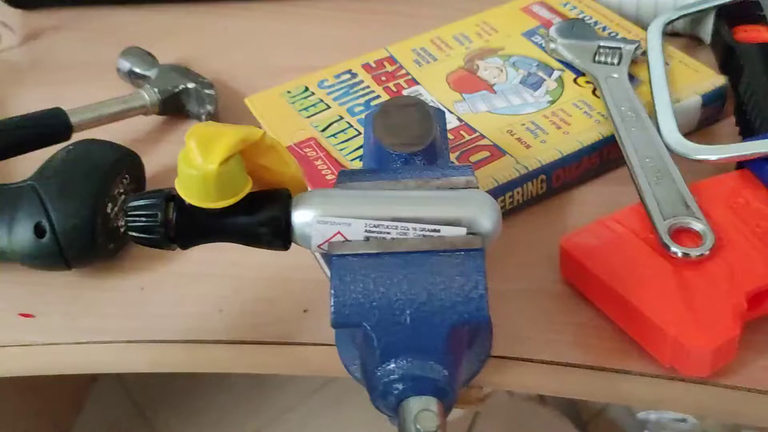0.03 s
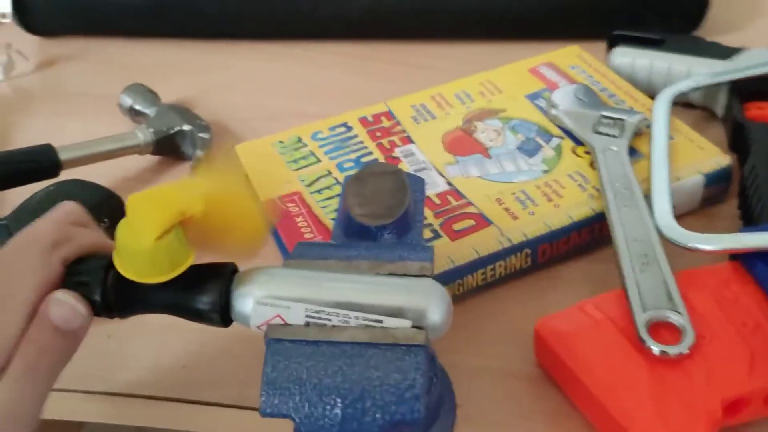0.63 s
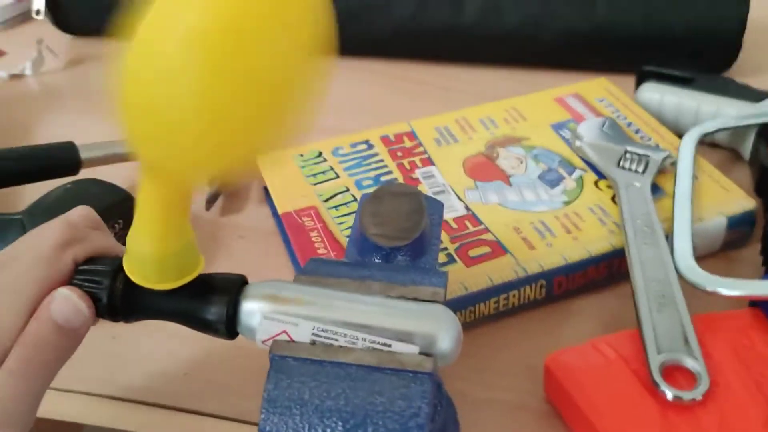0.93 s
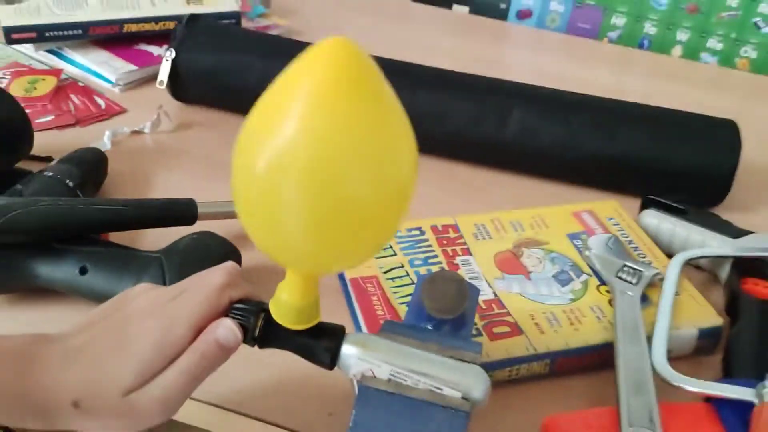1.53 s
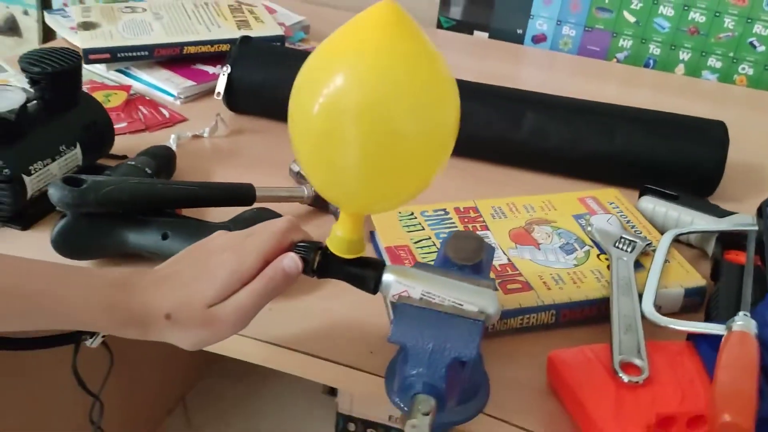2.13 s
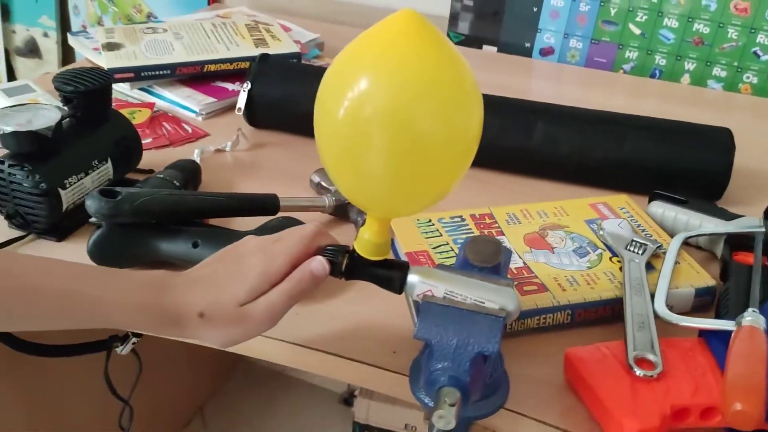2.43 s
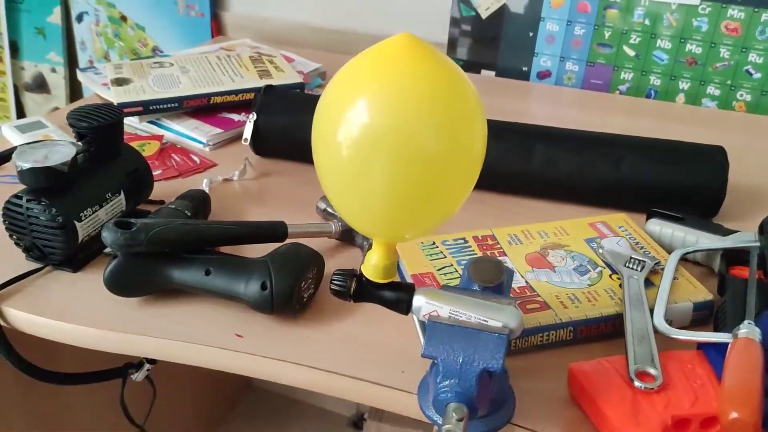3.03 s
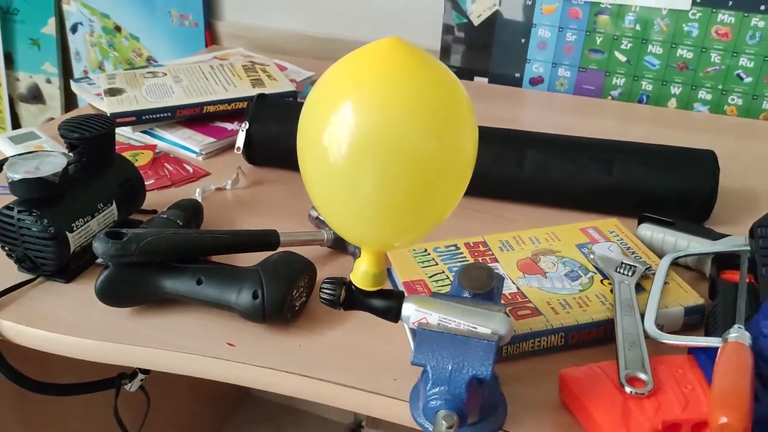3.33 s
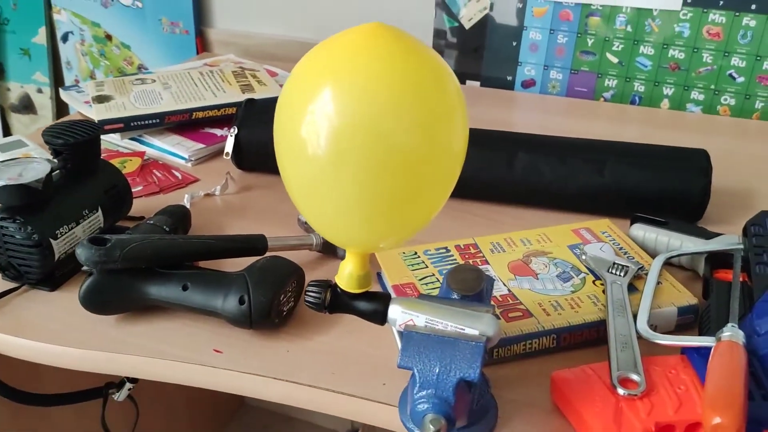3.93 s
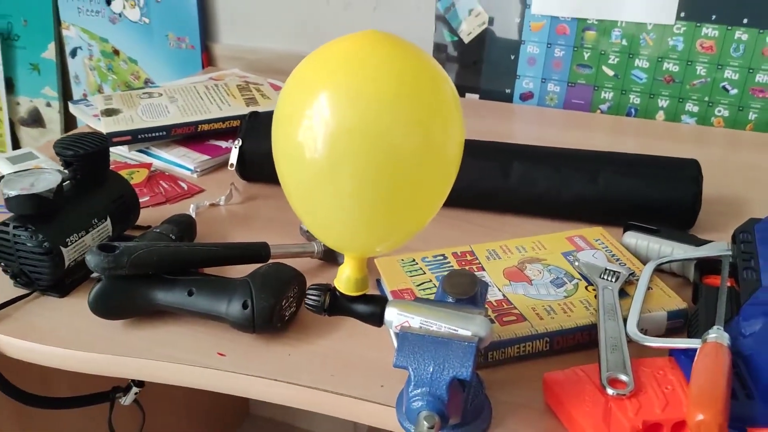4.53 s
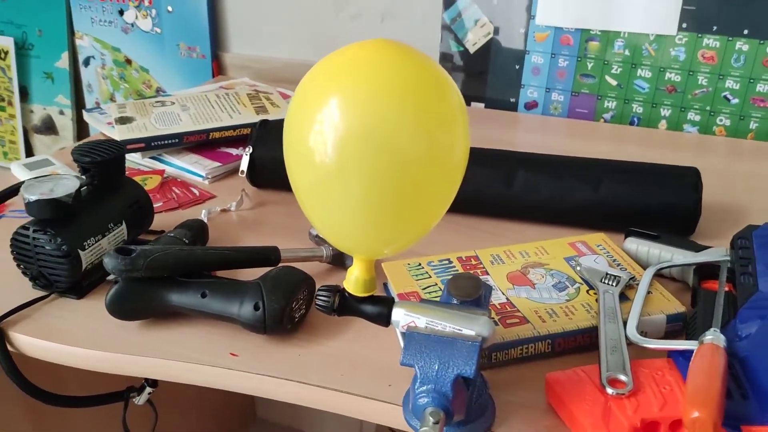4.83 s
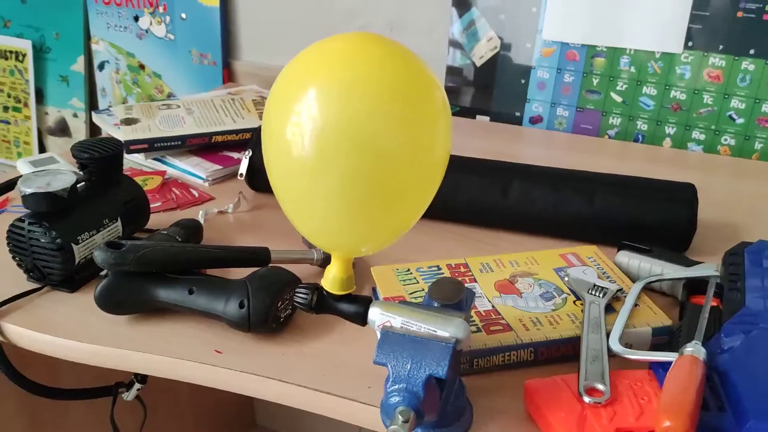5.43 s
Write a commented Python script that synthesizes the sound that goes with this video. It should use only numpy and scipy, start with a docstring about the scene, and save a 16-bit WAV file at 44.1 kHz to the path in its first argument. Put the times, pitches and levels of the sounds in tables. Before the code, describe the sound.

Faint valve clicks, then gas spurts from a cartridge and hisses loudly into a balloon, fading as the balloon swells.

```python
"""In a small humming room, a hand turns the valve of a CO2 cartridge clamped on a bench: clicks, seeping gas.
At 0.76 s the valve spurts, then opens to a loud turbulent hiss; a limp balloon flops, honks and stands up.
As it swells, its cavity resonances glide down and its skin rings higher; the hiss sinks with the pressure.
A low throb passes at 2.6 s, soft handling rubs follow after 4 s, and a distant engine drones near the end."""
import sys
import numpy as np
from scipy import signal
from scipy.fft import rfft, irfft, next_fast_len
from scipy.io import wavfile
from scipy.ndimage import map_coordinates

SR = 44100
rng = np.random.default_rng(int(sys.argv[2]) if len(sys.argv) > 2 else 0)


def master_out(mix):
    """Clip the mix to full scale and print it as 16-bit PCM to the path in sys.argv[1]."""
    frames = np.transpose(np.atleast_2d(mix))
    ceiling = np.clip(frames, -1, 1)
    pcm = np.round(ceiling * 32767).astype(np.int16)
    wavfile.write(sys.argv[1], SR, pcm)


N = 250929
TIME = np.arange(N) / SR
OPEN_S, OPEN_RISE_S, INFLATE_S = 0.849, 0.054, 0.87

# Jet spectrum: f/Hz, left/dB, right/dB
JET_SPECTRUM = [(150, -34.5, -37), (463, -29.5, -30), (872, -22, -21.5), (1002, -14, -13.5),
                (1495, -10, -5), (2340, -9, -6), (2850, -13, -8), (3290, -3.5, -11.5), (4170, -3.5, -8.5),
                (5140, -9, -12.5), (6540, -14.5, -16.5), (7680, -14, -3), (9000, -18.5, -9), (9690, -9, -9),
                (10580, -16, -25), (11600, -32.5, -33.5), (13730, -14.6, -20), (16400, -22.5, -31)]
# Valve and cartridge resonances: f/Hz, width/Hz, gain/dB
VALVE_MODES = [(1010, 110, 3), (1410, 90, 3), (2760, 220, -1.3), (3040, 50, 2.5), (3236, 45, 2),
               (3379, 70, 2.2), (3626, 55, 1.5), (3779, 50, 2), (4253, 60, 2), (4610, 80, 1),
               (7702, 60, 2.5), (9409, 50, 4)]
# Phase lead of left over right: f/Hz, lead/rad
JET_PHASE = [(300, 0), (1500, -0.14), (2000, 0.54), (3000, 1.5), (3700, 4), (4500, 4), (9000, 4.5)]
# Roar, hiss, fizz: full-pressure level/dB, pressure slope/(dB/dB), limp balloon/dB, kinked neck/dB
JET_LEVELS = [(-27, 1.1124, -1, 0), (-27.5, 0.8054, -1.5, -4.5), (-26.5, 1.25, -5, -0.5)]


def jet(roar_edge_hz=2800, fizz_edge_hz=6000, surge_db=0.46, sputter_db=0.4, eddy_db=0.5,
        upright_s=1.08, upright_rise_s=0.0096, pan_start_db=-1.43, pan_db_per_s=0.34, flop_db=6):
    """Turbulent gas fills the balloon: big eddies roar, small ones fizz, all sputter with the flow."""
    def response(hz):
        sides_db = np.array([along(JET_SPECTRUM, hz, column) for column in (1, 2)])
        lead = np.exp(1j * along(JET_PHASE, hz) * np.array([[0.5], [-0.5]]))
        return amp(sides_db + peaks(VALVE_MODES, hz)) * lead

    gas = balloon(filtered(stereo_noise(), response))
    below = lambda edge_hz: filtered(gas, lambda hz: 1 / (1 + (hz / edge_hz) ** 10))
    roar, below_fizz = below(roar_edge_hz), below(fizz_edge_hz)
    hiss, fizz = below_fizz - roar, gas - below_fizz
    limp = (1 - np.tanh((TIME - upright_s) / upright_rise_s)) / 2
    kink = swell(at_s=0.99, length_s=0.065)
    out = np.zeros((2, N))
    for band, (full_db, slope, limp_db, kink_db) in zip((roar, hiss, fizz), JET_LEVELS):
        level_db = full_db + slope * pressure_db() + limp_db * limp + kink_db * kink
        out += band / np.std(band.mean(0)) * amp(level_db + eddy_db * wobble(70))
    pan_db = pan_start_db + pan_db_per_s * (TIME - OPEN_S)  # left minus right; the microphone backs away
    pan_db += flop_db * swell(at_s=0.863, length_s=0.036)  # the balloon flops left
    flow = valve_opening() * amp(surge_db * wobble(22.115) + sputter_db * wobble(260))
    return out * flow * amp([pan_db / 2, -pan_db / 2])


# Spurts as the valve cracks open: t/s, attack/s, hold/s, opening/dB
VALVE_SPURTS = [(0.764, 0.013, 0.038, -.5), (0.857, 0.016, 0.033, 2.5), (0.927, 0.0063, 0.0095, 4)]


def valve_opening(release_s=0.01, leak_db=-13.5):
    """The valve spits three times, leaks in between and stays open."""
    spurts = [amp(db) * rise(start_s, attack_s) * np.exp(-since(start_s + hold_s) / release_s)
              for start_s, attack_s, hold_s, db in VALVE_SPURTS]
    leak = amp(leak_db) * rise(*VALVE_SPURTS[0][:2])
    return np.linalg.norm([*spurts, leak, rise(OPEN_S, OPEN_RISE_S)], axis=0)


def pressure_db(hold_s=0.97, knee=1.94):
    """Cartridge pressure holds briefly, then falls as 1/t while it cools and empties."""
    return -20 / knee * np.log10(1 + (since(OPEN_S) / hold_s) ** knee)


# Cavity peaks (+) and notches (-), before depth scaling:
# slack f/Hz, width/Hz, strongest t/s, length/s, left/dB, right/dB
CAVITY_MODES = [(3400, 400, 1.06, 0.3, 5.5, 4), (3500, 160, 2.25, 1.9, 3, 2), (4680, 450, 1.11, 0.19, 5, 8),
                (5010, 580, 1.01, 0.2, -10.5, -13), (5040, 140, 2.54, 0.27, 0, 10.5),
                (5150, 540, 2.73, 1.26, 4.5, -1.5), (5750, 210, 1.05, 0.42, 10.5, 13),
                (6310, 670, 1.05, 0.46, -12.5, -5.5), (6350, 110, 1.86, 0.25, 8.5, 4),
                (6360, 1100, 3.76, 0.73, 2, 4), (7120, 240, 0.8, 0.76, 12, 8.5),
                (7340, 900, 1.81, 0.36, -0.5, 8.5), (7250, 230, 3.3, 0.76, -2.4, -6.5),
                (7690, 130, 2.98, 0.45, 5.5, -3), (7900, 88, 5.66, 0.24, 4, 4),
                (8050, 130, 4.85, 0.46, 4.5, 4), (9150, 170, 4.9, 0.35, 3.5, 0),
                (7840, 630, 0.71, 1.26, -6.5, -11), (8100, 420, 3.5, 1.9, -0.5, -5),
                (8580, 280, 2, 1.26, 4.5, 11), (9160, 200, 4.5, 1.1, 3.5, 3.5),
                (9350, 1070, 1.4, 2.6, -4, -6), (9980, 270, 1.75, 3.4, 3, 6.5),
                (10900, 360, 2.4, 2.3, -2, -9.5), (11330, 370, 2.7, 1.35, 2, 7.5),
                (12400, 180, 3.9, 1.5, 0, -2), (12780, 430, 1.6, 3, 1.5, 0.5),
                (13700, 350, 7.2, 0.64, -10, 1), (14450, 260, 2.05, 0.47, 8.5, 3),
                (15500, 220, 4.7, 0.83, 4, -3), (15000, 300, 1.5, 0.33, 2, 6)]
# Honk of the slack neck: f/Hz, width/Hz, gain/dB
NECK_MODES = [(1700, 220, 5.5), (3040, 160, 6.5)]


def balloon(gas, depth=1.45, flat_share=0.6, skin_hz=1608, skin_width_hz=520, stiffening=0.63,
            slack_s=0.52, spacing_hz=1430, fine_db=3.0, fine_slack_db=1.8, fine_onset_hz=2800,
            fine_density=11, fine_turnover=14):
    """Cavity resonances sink as 1/radius while the stretching rubber rings ever higher."""
    hz, t, spectrum = signal.stft(gas, SR, nperseg=1024, noverlap=768)
    hz = hz[:, None]
    size = radius(t)
    filling = np.interp(t, TIME, rise(OPEN_S, OPEN_RISE_S))
    slack = filling * np.exp(-(since(INFLATE_S, t) / slack_s) ** 2)
    sides = lambda left_db, right_db: np.array([left_db, right_db])[:, None, None]
    modes = [(slack_hz / size, width_hz, sides(left_db, right_db) * swell(at_s, length_s, t))
             for slack_hz, width_hz, at_s, length_s, left_db, right_db in CAVITY_MODES]
    cavity_db = depth * peaks(modes, hz) * (flat_share + (1 - flat_share) * filling)
    skin_mode = (skin_hz * size ** stiffening, skin_width_hz, sides(left_db=2.2, right_db=5))
    skin_db = filling * peaks([skin_mode], hz)
    honk_db = slack * peaks(NECK_MODES, hz)
    # Fine, uneven modes come and go between the main ones, independently on each side.
    grid = np.broadcast_arrays(hz * size / spacing_hz * fine_density, np.log(size) * fine_turnover)
    fine = np.array([map_coordinates(rng.standard_normal((512, 64)), grid, order=1, mode="wrap")
                     for _ in gas])
    trapped = 1 - np.exp(-(hz / fine_onset_hz) ** 4)  # the thin skin lets low notes through
    ripple_db = (fine_db + fine_slack_db * slack) * trapped * fine
    spectrum = spectrum * amp(cavity_db + skin_db + honk_db + ripple_db)
    return signal.istft(spectrum, SR, nperseg=1024, noverlap=768)[1][:, :N]


def radius(t, fill_per_s=1.54, rush_per_s=1.375, rush_s=0.85):
    """Radius over slack radius; a steady inflow and an early rush add volume, in slack volumes."""
    age_s = since(INFLATE_S, t)
    rush_volume = rush_per_s * rush_s * (1 - np.exp(-age_s / rush_s))
    return np.cbrt(1 + fill_per_s * age_s + rush_volume)


# Rubber flaps: t/s, length/s, f/Hz, width/Hz, level/dB
RUBBER_FLAPS = [(0.784, 0.015, 377, 420, -47.5), (.98, 0.039, 272, 100, -51.5),
                (1.27, 0.089, 272, 110, -56)]


def flaps():
    """The rubber flaps dully as the gas first arrives."""
    return noise_swells(RUBBER_FLAPS)


# Knob slips: t/s, level/dB, length/s, ring f/Hz
KNOB_SLIPS = [(0.198, -71, .006, 4600), (0.233, -67, .008, 2300), (0.235, -53, .012, 360),
              (0.381, -59.5, 0.0084, 2200), (0.39, -59, 0.025, 7800), (0.704, -56.5, 0.02, 7840)]


def knob(grain_db=3, lean_db=2.5, q=6):
    """The plastic knob creaks in its thread in short grainy slips, each with its own ring."""
    out = np.zeros((2, N))
    for at_s, db, length_s, ring_hz in KNOB_SLIPS:
        ring = lambda hz: 1 / (1 + 1j * q * (hz / ring_hz - ring_hz / (hz + 1)))
        friction = rng.standard_normal((2, N)) * amp(grain_db * wobble(500))
        out += amp(db) * np.exp(-np.abs(TIME - at_s) / length_s) * unit(filtered(friction, ring))
    return out * amp([[-lean_db], [lean_db]])


# Seal leak spectrum: f/Hz, relative level/dB
SEEP_SPECTRUM = [(500, -13), (1300, -4), (3000, -8), (6300, -12), (7750, -6), (9500, -13.5), (15500, -17)]


def seep(start_s=0.06, attack_s=0.13, level_db=-67):
    """Gas creeps past the seal as the knob turns, until the first spurt."""
    creeping = rise(start_s, attack_s) * (1 - rise(VALVE_SPURTS[0][0], OPEN_RISE_S))
    return amp(level_db + wobble(11.7)) * creeping * coloured(SEEP_SPECTRUM)


# Handling rubs: t/s, length/s, f/Hz, width/Hz, level/dB
HAND_RUBS = [(4.09, .06, 420, 327, -57.5), (4.33, 0.041, 297, 282, -56.5)]


def rubs():
    """Handling makes two soft, low rubs."""
    return noise_swells(HAND_RUBS)


def bench(x, count=14, lag_range_s=(0.002, 0.011), echo_db=-8, changes_per_s=1.3, low_cut_hz=980):
    """Short echoes off bench and tools come and go as the microphone moves: a hollow ringing."""
    echoes = np.zeros((2, N))
    for side, lags_s in enumerate(rng.uniform(*lag_range_s, (2, count))):
        for lag_s in lags_s:
            echoes[side] += wobble(changes_per_s) * np.pad(x[side], (int(lag_s * SR), 0))[:N]
    echoes = filtered(echoes, lambda hz: hz / np.hypot(hz, low_cut_hz))  # long waves pass the tools
    return x + amp(echo_db) / np.sqrt(count) * echoes


# Room decay: f/Hz, T60/s
ROOM_T60 = [(200, 0.071), (2000, 0.27), (8000, 0.021), (15000, 0.0045)]


def room(x, tail_db=-13):
    """The walls add a short tail."""
    hz, t, noise = signal.stft(rng.standard_normal((2, SR // 2)), SR, nperseg=256)
    decay = amp(-60 * t / along(ROOM_T60, hz)[:, None])
    tail = signal.istft(noise * decay, SR, nperseg=256)[1]
    return x + amp(tail_db) * signal.fftconvolve(x, tail / np.linalg.norm(tail[0]), axes=1)[:, :N]


# Engine orders: multiple of firing rate, peak t/s, length/s, level/dB
ENGINE_ORDERS = [(1, 4.92, 0.26, -58), (2, 5.2, 0.077, -57.5), (2, 5.43, 0.55, -58.5),
                 (3, 5.57, 0.3, -55.5), (5, 5.5, 0.45, -66)]
# Engine rush: peak t/s, length/s, f/Hz, width/Hz, level/dB
ENGINE_NOISE = [(4.9, 0.4, 191, 171, -58)]


def engine(firing_hz=80.8, drift=0.0046, rough_rad=0.99):
    """A distant engine comes into earshot: a dull rush, and rough orders swelling in turn."""
    phase = 2 * np.pi * np.cumsum(firing_hz * (1 + drift * wobble(6.7))) / SR
    order = lambda k: unit(np.sin(k * phase + rough_rad * wobble(42)))
    drone = sum(amp(db) * swell(at_s, length_s) * order(k) for k, at_s, length_s, db in ENGINE_ORDERS)
    return drone + noise_swells(ENGINE_NOISE)


# Room tone spectrum: f/Hz, relative level/dB
AIR_SPECTRUM = [(30, -23), (100, -14), (240, -1), (400, -11.5), (1000, -16), (2500, -37), (7000, -40),
                (15500, -47)]
# Rumble spectrum: f/Hz, relative level/dB
RUMBLE_SPECTRUM = [(15, -6.5), (25, -4), (44, 1), (58, -22), (70, -13), (130, -22.5), (300, -80)]


def background(air_db=-65, hum_hz=323, hum_db=-68, throb_hz=43, throb_db=-46,
               rumble_db=-54, wander_db=1.5):
    """Room tone, an appliance hum and a low rumble that throbs once."""
    hum = amp(hum_db + wobble(4.2)) * np.sin(2 * np.pi * hum_hz * TIME + 0.27 * wobble(3.9))
    throb = amp(throb_db) * swell(at_s=2.57, length_s=0.31) * np.sin(2 * np.pi * throb_hz * TIME)
    air = amp(air_db) * coloured(AIR_SPECTRUM)
    rumble = amp(rumble_db - wander_db * wobble(3.09)) * coloured(RUMBLE_SPECTRUM)
    return air + rumble + np.sqrt(2) * (hum + throb)


# Left-right likeness of the noise: f/Hz, correlation
STEREO_CORRELATION = [(300, 0.64), (1100, 0.93), (2000, 0.79), (4000, 0.45), (7000, 0.6), (12000, 0.12)]


def stereo_noise():
    """White noise, nearly mono around 1 kHz and less alike in the treble."""
    def mid_side(hz):
        angle = np.arccos(np.clip(along(STEREO_CORRELATION, hz), -1, 1)) / 2
        return np.array([np.cos(angle), np.sin(angle)])

    mid, side = filtered(rng.standard_normal((2, N)), mid_side)
    return np.array([mid + side, mid - side])


def coloured(spectrum):
    """Stereo noise of rms 1 with the given spectrum."""
    return unit(filtered(stereo_noise(), lambda hz: amp(along(spectrum, hz))))


def noise_swells(rows):
    """One swell of band noise per row."""
    out = np.zeros(N)
    for at_s, length_s, centre_hz, width_hz, db in rows:
        band = filtered(rng.standard_normal(N), lambda hz: np.exp(-((hz - centre_hz) / width_hz) ** 2))
        out += amp(db) * swell(at_s, length_s) * unit(band)
    return out


def filtered(x, response):
    """Apply a frequency response."""
    size = next_fast_len(N + SR // 2)
    return irfft(rfft(x, size) * response(np.fft.rfftfreq(size, 1 / SR)), size)[..., :N]


def peaks(modes, hz):
    """Gain in dB of resonances (f/Hz, width/Hz, gain/dB)."""
    return sum(db / (1 + (2 * (hz - centre) / width) ** 2) for centre, width, db in modes)


def along(table, hz, column=1):
    """Interpolate a table column over log frequency."""
    columns = np.transpose(table)
    return np.interp(np.log(hz + 1), np.log(columns[0]), columns[column])


def wobble(knots_per_s):
    """Smooth random curve."""
    return map_coordinates(rng.standard_normal(int(N * knots_per_s / SR) + 4), [TIME * knots_per_s])


def swell(at_s, length_s, t=TIME):
    """Bell-shaped rise and fall."""
    return np.exp(-((t - at_s) / length_s) ** 2)


def rise(start_s, attack_s):
    """Smooth climb from 0 to 1."""
    return 1 - np.exp(-(since(start_s) / attack_s) ** 2)


def since(start_s, t=TIME):
    """Seconds elapsed, 0 before the start."""
    return np.maximum(t - start_s, 0)


def amp(db):
    """Decibels to gain."""
    return 10 ** (np.asarray(db) / 20)


def unit(x):
    """Scale to rms 1."""
    return x / np.sqrt(np.mean(x ** 2) + 1e-20)


def scene():
    """Jet, balloon and valve on the bench in the room, over the background."""
    return room(bench(jet() + seep() + knob() + flaps())) + rubs() + background() + engine()


def record(dry, top_hz=15850):
    """The sound fades in after a moment and is cut off above top_hz."""
    fade_db = np.interp(TIME, [0.145, 0.153, 0.3, 0.4], [-69, -8, -5.5, -2.5])
    return filtered(dry * amp(fade_db), lambda hz: hz < top_hz)


dry = scene()
out = record(dry)
master_out(out)
```